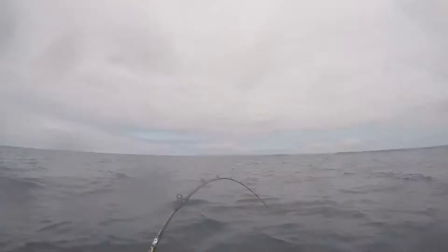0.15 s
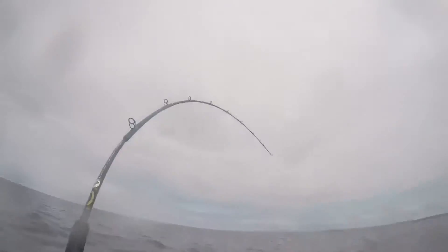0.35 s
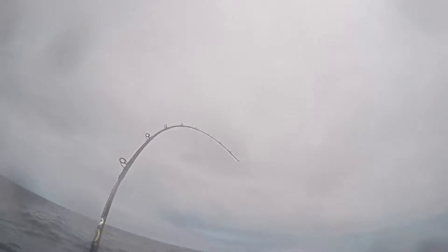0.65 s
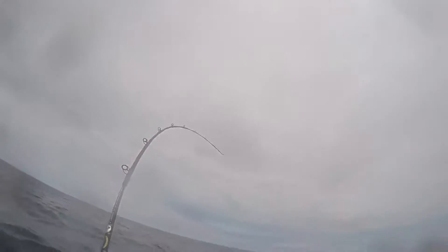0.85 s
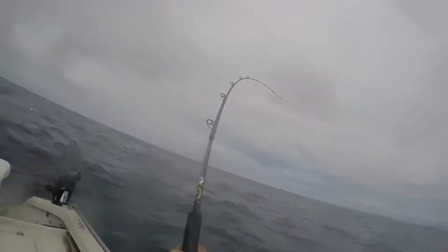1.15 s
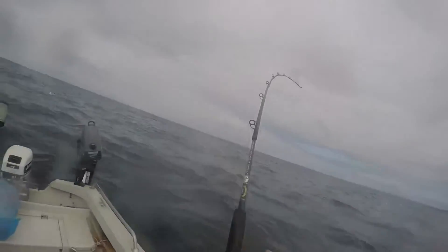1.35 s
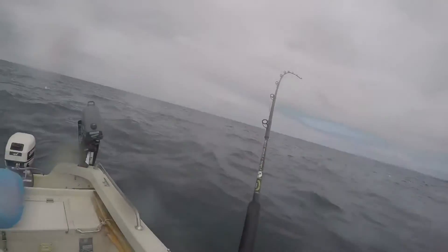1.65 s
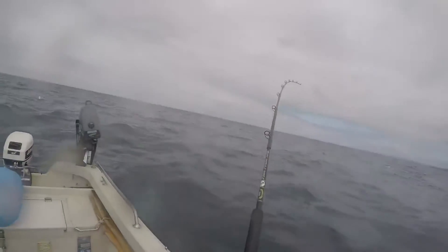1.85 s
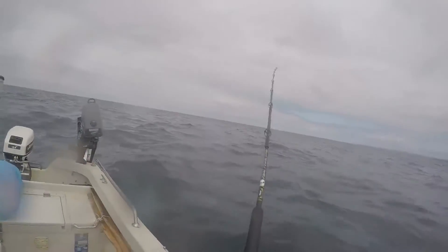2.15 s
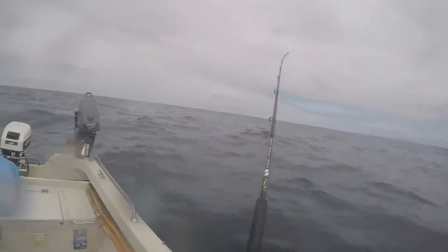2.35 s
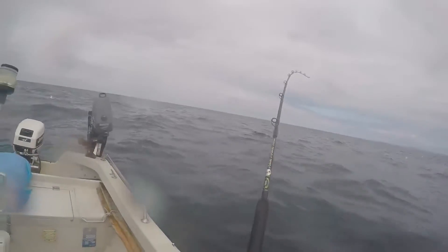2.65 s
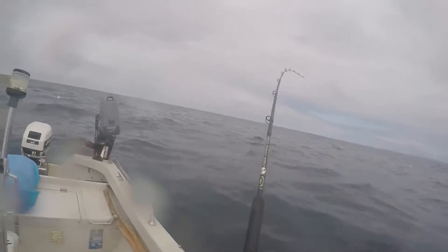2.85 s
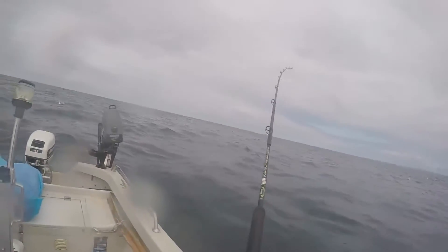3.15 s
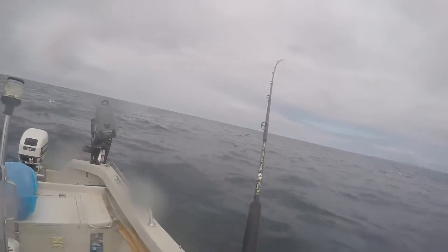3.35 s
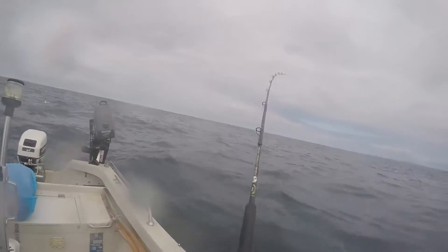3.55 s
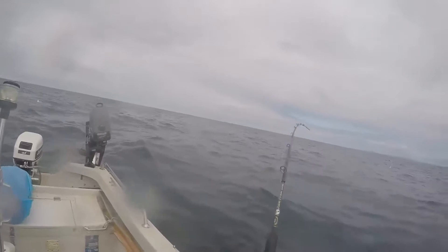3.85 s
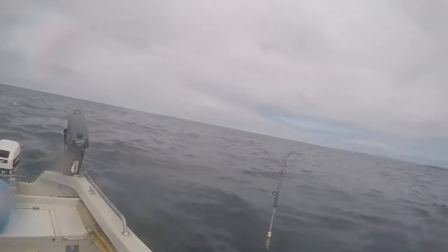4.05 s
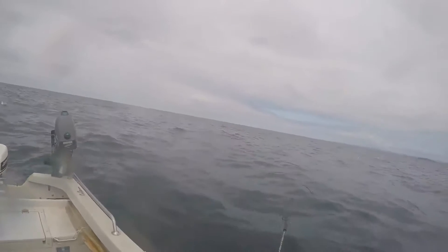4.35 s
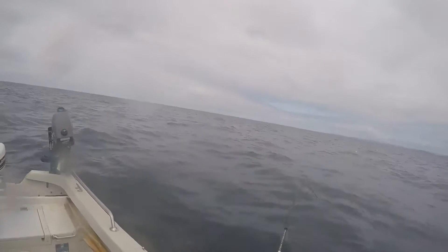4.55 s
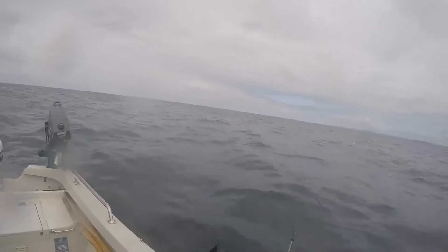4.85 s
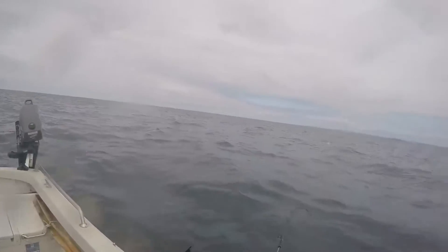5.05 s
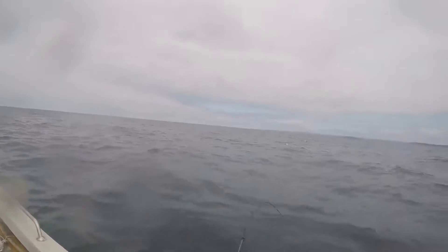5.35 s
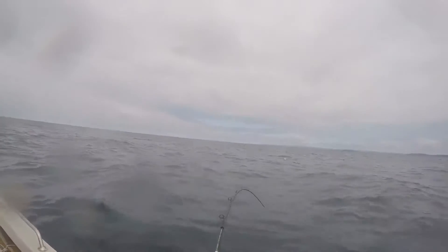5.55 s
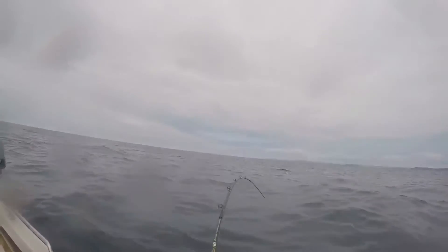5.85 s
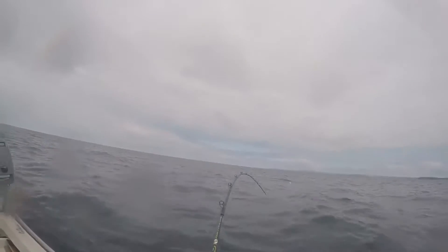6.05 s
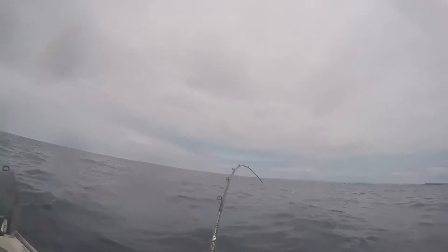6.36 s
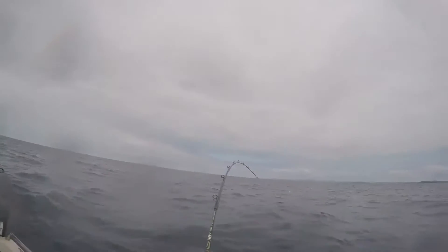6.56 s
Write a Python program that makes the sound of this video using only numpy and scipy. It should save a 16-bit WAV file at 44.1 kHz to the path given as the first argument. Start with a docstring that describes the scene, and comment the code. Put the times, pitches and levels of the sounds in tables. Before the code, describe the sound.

On a small boat in open air, a close microphone is battered by low, fluttering wind. A fishing reel ticks lightly while wound, its ratchet zips briefly, the hand knocks the frame sharply, then the ratchet buzzes for over a second with surging speed and thin line hiss. A shorter buzz and stray clicks follow, and the last run winds down click by click.

```python
"""A trolling reel gives line to a fish from a small boat: its ratchet buzzes in fast runs, slows to single
clicks. Every tooth strikes the pawl as a blow, a bounce and a rattle, coloured by noise bodies, modes and
spring sizzle. Around the runs, struck modes make gear ticks and frame clacks; shaped noise makes hand scrapes
and line hiss. Wind is noise in three bands driven by one strength, with windowed sine thumps, over a steady
wash of sea. A soft rush opens the scene; the sound then drops to near silence briefly before the wind sets in."""
import sys
import numpy as np
from scipy import signal
from scipy.fft import rfft, irfft, next_fast_len
from scipy.io import wavfile
from scipy.ndimage import uniform_filter1d, map_coordinates

SR = 44100
rng = np.random.default_rng(int(sys.argv[2]) if len(sys.argv) > 2 else 0)


def dump_mix(stems):
    """Bounce the given channels to the path in sys.argv[1] as a 16-bit WAV at rate SR."""
    frames = np.atleast_2d(stems).T  # one column per channel
    limited = np.clip(frames, -1, 1)  # hard clip at full scale
    pcm = np.round(limited * 32767).astype(np.int16)
    wavfile.write(sys.argv[1], SR, pcm)


N = 295600  # length in samples

# Spool speed in the buzzing runs and as it slows almost to rest: [t/s, rate/(teeth per s)]
FIRST_RUN = [(2.049, 59), (2.09, 123), (2.25, 246), (2.32, 190), (2.356, 47)]
LONG_RUN = [(3.574, 61.62), (3.7368, 178.66), (3.8157, 120.09), (3.8989, 180.61), (3.9602, 150.43),
            (4.05, 227.11), (4.09, 109.7), (4.24, 187.89), (4.3, 151.83), (4.36, 52.15), (4.4401, 145.59),
            (4.4795, 78.39), (4.5748, 113.15), (4.6235, 68.82), (4.907, 66.68)]
SHORT_RUN = [(4.976, 79), (5.04, 105.4), (5.129, 59.3), (5.18, 96.1), (5.222, 45.1)]
RUN_DOWN = [(5.483, 48.38), (5.556, 72.29), (5.614, 40.47), (5.696, 30.65), (5.76, 34.82), (6.04, 27.5),
            (6.09, 21.09), (6.16, 25.69), (6.21, 16.78), (6.28, 20.72), (6.39, 5.4)]
# Single teeth passing the pawl as the spool creeps: [t/s, nominal level/dB]
TEETH = [(0.6401, -22), (2.017, -22), (2.3955, -19), (2.4375, -21), (2.4782, -16), (2.505, -21),
         (2.529, -20.5), (2.5725, -20), (2.6923, -21.5), (2.7282, -13.5), (4.9322, -13.5), (4.9581, -21),
         (5.3178, -16.5), (5.3447, -16), (5.3716, -18)]
# Click colour of the pawl, the whole frame, a slow rounder tooth, the spring: [f/Hz, relative level/dB per Hz]
PAWL = [(600, -37), (1150, -3), (1550, -18.5), (1900, -7), (2300, -16), (3500, -14), (4500, -1.5),
        (5450, 1), (6400, 1), (7100, -2.5), (8700, -10), (9800, -6), (11500, -22), (14500, -15.5)]
FRAME = [(600, -38), (950, -4), (1200, 3), (1550, -10.5), (2500, -4.5), (3200, -1.5), (4800, 1),
         (6200, -1.5), (7200, -2), (8200, -9), (10300, -10), (11600, -16.5), (14500, -12.5)]
SLOW_PAWL = [(600, -31), (1200, -0.5), (1550, -13), (2300, -6), (3200, -5), (4100, 0.5), (5200, 2),
             (6000, -2.5), (7000, -1), (9100, -11), (9800, -4), (10700, -17.5), (12200, -23), (15000, -13)]
SPRING = [(5000, -25), (8000, 1), (10000, 0), (11800, 0.5), (14000, 3), (15500, -6.5)]
# Ringing modes of the steel pawl, the knocked frame and the winding gear: [f/Hz, relative level/dB, t60/s]
PAWL_MODES = [(4530, -2, 0.0093), (5490, 0, 0.0051), (6070, -2.5, 0.0071), (7400, -10, 0.0033)]
FRAME_MODES = [(1105, 1, 0.045), (1270, -7, 0.041), (1688, 5, 0.03), (2433, 4, 0.053), (3105, 5, 0.035),
               (3610, 3, 0.033), (5000, -10, .03), (6100, -15, .025)]
GEAR_MODES = [(2600, -17, .008), (2726, 6.5, 0.0069), (3100, -12, 0.0055), (3910, -1, 0.0087),
              (4790, -1, 0.01), (5040, -7, 0.0087)]
# Loudest ticks of the winding gear: [t/s, nominal level/dB]
TICKS = [(0.626, -29), (0.7914, -32), (0.8198, -31.5), (0.8624, -25), (1.042, -25.5), (1.071, -23),
         (1.1468, -31.5), (1.2155, -27.5), (1.297, -30), (1.3611, -21), (1.5093, -27), (1.6436, -28.5),
         (1.7314, -27), (1.7903, -23.5), (1.9175, -24), (2.0056, -24.5), (2.616, -20.5), (2.9129, -29),
         (3.0526, -21.5), (3.1857, -23)]
# Spells of winding that carry faint ticks: [start t/s, end t/s]
WINDING = [(.342, .6), (1.877, 2.5), (6.427, 6.62)]
# Clacks of the reel under the hand: [t/s, nominal level/dB, ring against that level/dB]
CLACKS = [(2.976, -33, -11), (2.9842, -6.5, -17.5), (2.992, -30, -13), (3.041, -11.5, -25)]
# Short scrapes of the hand on the reel: [t/s, level at the crest/dB, decay length to each side/s]
SCRAPES = [(0.646, -48, .006), (1.038, -46, 0.014), (2.734, -48, 0.0075), (2.98, -29, 0.0073),
           (6.48, -64, 0.012)]
# Line rubbing through the guides: [t/s, level/dB]
LINE = [(3.15, -90), (3.26, -40), (3.55, -48), (3.7, -38), (4.3, -39.5), (4.9, -46), (5.25, -39.5),
        (5.56, -42), (5.66, -49), (6.2, -57.5), (6.42, -100)]
# Colour of the line hiss: [f/Hz, relative level/dB per Hz]
LINE_COLOUR = [(900, -12), (2000, -11), (2700, -6.5), (4200, -8), (4700, -2), (5300, -3), (5900, -5.5),
               (6500, -13), (7500, -18.5), (8700, -28.5), (10500, -21), (15000, -29)]
# Strength of the wind on the microphone, before its small gusts: [t/s, level/dB]
WIND = [(0.24, -45), (0.36, -32.5), (0.45, -34.5), (0.6, -23.6), (0.75, -31.3), (0.8, -21), (1.2, -19),
        (1.4, -14), (1.68, -15), (1.92, -19), (2.52, -22.5), (2.56, -17.5), (2.86, -19.5), (2.93, -29),
        (2.99, -18.5), (3.42, -17.5), (3.5, -13.5), (3.76, -20), (4.17, -18.5), (4.3, -14.5), (4.36, -21),
        (4.61, -16), (4.66, -21), (5.12, -15.5), (5.45, -16.5), (5.84, -21.5), (5.97, -16.5), (6.67, -16.5)]
# Colour of the slow buffets, the fluttering roar, its ragged upper edge, the sea: [f/Hz, relative level/dB per Hz]
BUFFET = [(10, -20), (22, 0), (42, 0.5), (75, -2), (110, -8), (200, -17.5), (500, -80)]
FLUTTER = [(50, -20), (110, -0.5), (180, 0), (320, -.5), (440, -3), (520, -9), (620, -19.5), (800, -41),
           (1400, -81)]
EDGE = [(350, -12.5), (600, 8), (800, 1.5), (1100, -5.5), (1500, -12.5), (2000, -20.5), (2600, -19),
        (3400, -28.5), (4800, -32), (6500, -55.5), (15000, -57)]
SEA = [(200, 3), (800, -9), (2600, 0), (3600, -9.5), (4900, -5.5), (6500, -11.5), (10000, -17.5),
       (15000, -25)]
# Heavy gusts that thump the microphone: [t/s, level/dB, f/Hz, Gaussian length/s]
THUMPS = [(0.793, -10.5, 59.7, 0.01), (0.946, -9, 54.6, 0.015), (2.89, -11.5, 42.5, 0.05)]

# Ratchet: nominal tooth levels, and the steady fade through the long and short runs
FIRST_DB, RUN_DOWN_DB = -24.5, -16.5
LONG_DB, LONG_FADE_DB_PER_S = -25, 3
SIZZLE_RATE, SIZZLE_GROWS = 160, 0.22  # teeth per s that leave the sizzle gain at 1; power of the speed
# Faint gear ticks: mean gap, timing scatter, nominal level, level scatter
TICK_GAP_S, TICK_JITTER_S, FAINT_TICK_DB, TICK_SCATTER_DB = .078, .003, -39.5, 0.5
# Wind: roar against the strength; depth and pace of its small gusts
FLUTTER_DB, GUST_DB, GUSTS_PER_S = -0.24, 1.44, 12
# Buffets: offset from the smoothed strength, smoothing span, independent swing, ceiling before that swing
BUFFET_DB, BUFFET_SPAN_S, BUFFET_SWING_DB, BUFFET_TOP_DB = 2.5, 0.24, 1.3, -18.5
EDGE_DB, EDGE_GROWS, USUAL_WIND_DB = -38, 1.38, -18  # edge level at the usual strength; dB per dB of strength
WIND_START_S, WIND_RISE_S = .22, 0.03
LULL_DB, SILENCE_DB, LULL_END_S = -44.5, -88, .127
TOP_HZ = 15600  # upper band limit


def first_run():
    """The first burst of speed shakes the whole frame of the reel."""
    times, db = tooth_times(FIRST_RUN, FIRST_DB, jitter=.00004, scatter_db=2.13)
    blows = strikes(times, db + 18, bounce_db=-8.5, bounce_lag=.0005, rattle_db=1.0, rattle_t60=0.023)
    click = ring(blows, FRAME)
    frame_ring = amp(-15) * ringing(blows, FRAME_MODES)
    spring = amp(-14.5) * sizzle(blows, t60=.035)
    return click + frame_ring + spring


def long_runs():
    """The pawl buzzes over the teeth as the fish surges and tires; the faster, the more the spring sizzles."""
    runs = [tooth_times(run, LONG_DB, jitter=.00004, scatter_db=1.75) for run in (LONG_RUN, SHORT_RUN)]
    times, db = np.hstack(runs)
    db = db - LONG_FADE_DB_PER_S * (times - times[0])
    blows = strikes(times, db + 19.5, bounce_db=-5, bounce_lag=.0005, rattle_db=0, rattle_t60=0.012)
    speed = curves(np.vstack([LONG_RUN, SHORT_RUN]))[0]
    spring = (speed / SIZZLE_RATE) ** SIZZLE_GROWS * sizzle(blows, t60=.045)
    return ring(blows, PAWL) + amp(-9) * ringing(blows, PAWL_MODES) + amp(-12.0) * spring


def single_teeth():
    """The pawl drops over one tooth at a time, as the spool creeps and as it runs down."""
    run_down = tooth_times(RUN_DOWN, RUN_DOWN_DB, jitter=.00006, scatter_db=0.3)
    times, db = np.hstack([np.transpose(TEETH), run_down])
    blows = strikes(times, db + 6, bounce_db=-4.5, bounce_lag=.0006, rattle_db=2, rattle_t60=0.016)
    return ring(blows, SLOW_PAWL) + amp(-14.5) * sizzle(blows, t60=0.035)


def tooth_times(run, db, jitter, scatter_db):
    """Times and levels of the teeth: one click each time the spool has turned one tooth further."""
    s, rate = np.transpose(run)
    t = np.arange(s[0], s[-1], 1 / SR)
    turned = np.cumsum(np.interp(t, s, rate)) / SR  # in teeth
    times = np.interp(np.arange(int(turned[-1]) + 1), turned, t)
    chance = rng.standard_normal((len(times), 2))
    return times + jitter * chance[:, 0], db + scatter_db * chance[:, 1]


def sizzle(blows, t60):
    """The pawl spring trembles on after every blow: thin noise follows the decaying energy of the blows."""
    keep = np.exp(-2 * np.log(1000) / (t60 * SR))
    energy = signal.lfilter([1 - keep], [1, -keep], blows ** 2)
    return np.sqrt(energy) * noise(SPRING)


def gear():
    """Metallic ticks from inside the reel while line is wound in: blows exciting the modes of the gear."""
    times, db = np.vstack([TICKS, faint_ticks()]).T
    blows = strikes(times, db + 12, bounce_db=-12, bounce_lag=0.00095, rattle_db=-4.5, rattle_t60=0.032)
    return ringing(blows, GEAR_MODES)


def faint_ticks():
    """Rows [t/s, level/dB] of the small, slightly uneven ticks that run through each spell of winding."""
    times = np.concatenate([np.arange(start, end, TICK_GAP_S) for start, end in WINDING])
    chance = rng.standard_normal((len(times), 2))
    uneven = times + TICK_JITTER_S * chance[:, 0]
    return np.column_stack([uneven, FAINT_TICK_DB + TICK_SCATTER_DB * chance[:, 1]])


def clacks():
    """Hard knocks: a noisy crack of the frame, and a push that sets its modes ringing."""
    times, db, ring_db = np.transpose(CLACKS)
    crack = strikes(times, db + 4.5, bounce_db=-5, bounce_lag=0.0006, rattle_db=4, rattle_t60=0.027)
    push = strikes(times, db + ring_db + 25, bounce_db=-22, bounce_lag=0.00017, rattle_db=-8, rattle_t60=.02)
    return ring(crack, FRAME) + ringing(push, FRAME_MODES)


def scrapes():
    """The hand slides briefly over the frame: frame-coloured noise swells and dies exponentially."""
    t = np.arange(N) / SR
    swell = sum(amp(db) * np.exp(-abs(t - s) / length) for s, db, length in SCRAPES)
    return noise(FRAME) * swell


def line():
    """Taut line hisses through the guides: coloured noise broken up by a fine random grain."""
    grain = amp(3.3 * wobble(350))
    return amp(curves(LINE)[0]) * unit(noise(LINE_COLOUR) * grain)


def deck(x, t60):
    """The deck and gunwale scatter a short answer: a dying noise tail, 2.5 ms late."""
    return signal.fftconvolve(x, np.pad(burst(t60), (SR // 400, 0)))[:N]


def wind():
    """One strength drives the eddies at the microphone: slow buffets, a fluttering roar, a ragged upper edge."""
    strength_db = curves(WIND)[0] + GUST_DB * wobble(GUSTS_PER_S)
    mean_db = uniform_filter1d(strength_db, int(BUFFET_SPAN_S * SR))
    buffet_db = np.minimum(mean_db + BUFFET_DB, BUFFET_TOP_DB)
    edge_db = EDGE_DB + EDGE_GROWS * (strength_db - USUAL_WIND_DB)
    eddies = wobble(70)  # shared by roar and edge
    buffet = amp(buffet_db + BUFFET_SWING_DB * wobble(GUSTS_PER_S)) * noise(BUFFET)
    flutter = amp(strength_db + FLUTTER_DB) * unit(noise(FLUTTER) * amp(1.05 * eddies))
    edge = amp(edge_db) * unit(noise(EDGE) * amp(1.9 * eddies + 1.13 * wobble(160)))
    blowing = np.clip((np.arange(N) / SR - WIND_START_S) / WIND_RISE_S, 0, 1)
    return blowing * (buffet + flutter + edge)


def thumps():
    """A large eddy swings the pressure: a low sine under a Gaussian swell."""
    t = np.arange(N) / SR
    out = np.zeros(N)
    for s, db, hz, length in THUMPS:
        swell = np.exp(-((t - s) / length) ** 2)
        out += amp(db) * swell * np.sin(2 * np.pi * hz * (t - s))
    return out


def sea():
    """The wash around the hull: coloured noise that comes up early on, then wavers gently."""
    rise_db = np.interp(np.arange(N) / SR, [.21, .25, 1.1], [-40, -9, 0])
    return amp(-56.0 + rise_db + 1.3 * wobble(5.34)) * noise(SEA)


def lull():
    """A soft rush of air, mixed from the wind colours; then the level drops to near silence."""
    db = np.interp(np.arange(N) / SR, [LULL_END_S, LULL_END_S + .006], [LULL_DB, SILENCE_DB])
    return amp(db) * unit(noise(FLUTTER) + noise(BUFFET) + 0.17 * noise(EDGE))


def strikes(times, levels_db, bounce_db, bounce_lag, rattle_db, rattle_t60):
    """Each contact is one sharp blow, a quick bounce and a rattle of loose parts."""
    out = np.zeros(N + SR)
    for s, db in zip(times, levels_db):
        blow = amp(rattle_db) * burst(rattle_t60)
        blow[0] += 1
        bounce_at = int(bounce_lag * rng.uniform(.5, 1.5) * SR)
        blow[bounce_at] += amp(bounce_db)
        out[round(s * SR):][:len(blow)] += amp(db) * blow
    return out[:N]


def burst(t60):
    """Dying noise of unit energy."""
    t = np.arange(SR // 8) / SR
    x = amp(-60 * t / t60) * rng.standard_normal(len(t))
    return x / np.linalg.norm(x)


def ring(x, spectrum, size=4096):
    """Pass x through a causal, minimum-phase body of unit energy with this spectrum."""
    cepstrum = irfft(np.log(gain_at(spectrum, np.fft.rfftfreq(size, 1 / SR))))
    # folding the cepstrum forward in time makes the body speak at once
    cepstrum[1:size // 2] *= 2
    cepstrum[size // 2 + 1:] = 0
    body = irfft(np.exp(rfft(cepstrum)))
    return signal.fftconvolve(x, body / np.linalg.norm(body))[:N]


def ringing(x, modes):
    """Pass x through damped modes of unit energy in all."""
    t = np.arange(SR // 8) / SR
    body = sum(amp(db - 60 * t / t60) * np.sin(2 * np.pi * hz * t) for hz, db, t60 in modes)
    body *= 1 - np.exp(-t / 0.00015)  # the metal takes a moment to start swinging
    return signal.fftconvolve(x, body / np.linalg.norm(body))[:N]


def noise(spectrum):
    """Coloured noise of rms 1."""
    return unit(filtered(rng.standard_normal(N), lambda hz: gain_at(spectrum, hz)))


def filtered(x, response):
    """x with its spectrum multiplied by a response of frequency."""
    m = next_fast_len(N + SR // 2)
    return irfft(rfft(x, m) * response(np.fft.rfftfreq(m, 1 / SR)), m)[:N]


def gain_at(spectrum, hz):
    """Gain of [f/Hz, level/dB] points joined on a log axis."""
    f, db = np.transpose(spectrum)
    return amp(np.interp(np.log(hz + 1), np.log(f + 1), db))


def curves(rows):
    """One value per sample for each column after the time."""
    s, *cols = np.transpose(rows)
    return [np.interp(np.arange(N) / SR, s, c) for c in cols]


def wobble(rate):
    """A smooth random curve, rate knots a second."""
    knots = rng.standard_normal(int(N * rate / SR) + 4)
    return map_coordinates(knots, [np.arange(N) * rate / SR])


def amp(db):
    """Decibels to gain."""
    return 10 ** (np.asarray(db) / 20)


def unit(x):
    """Scale to rms 1."""
    return x / np.sqrt(np.mean(x ** 2) + 1e-20)


def scene():
    """The reel and its answer from the deck, in wind and sea."""
    ratchet = first_run() + long_runs() + single_teeth()
    reel = ratchet + gear() + clacks() + scrapes() + line()
    answer = amp(-10.5) * deck(reel, t60=0.066)
    background = wind() + thumps() + sea() + lull()
    return (reel + answer + background)[None]


def record(dry):
    """Fade both ends over 90 samples and cut steeply above the band limit."""
    fade = np.minimum(1, np.minimum(np.arange(N), np.arange(N)[::-1]) / 90)
    return filtered(dry[0] * fade, lambda hz: 1 / np.sqrt(1 + (hz / TOP_HZ) ** 160))[None]


dry = scene()
out = record(dry)
dump_mix(out)
```